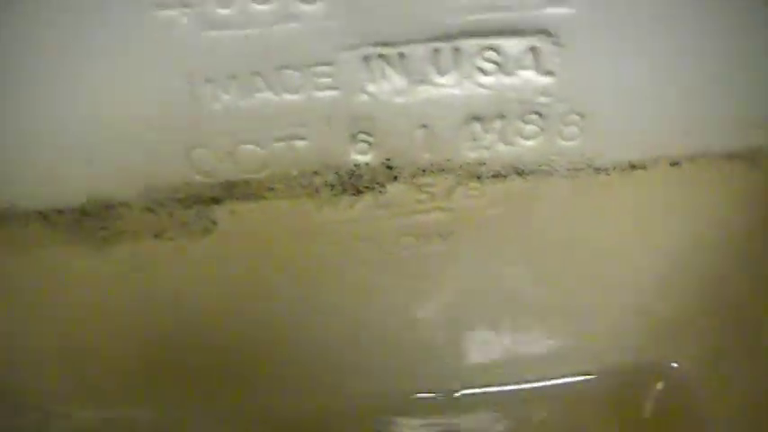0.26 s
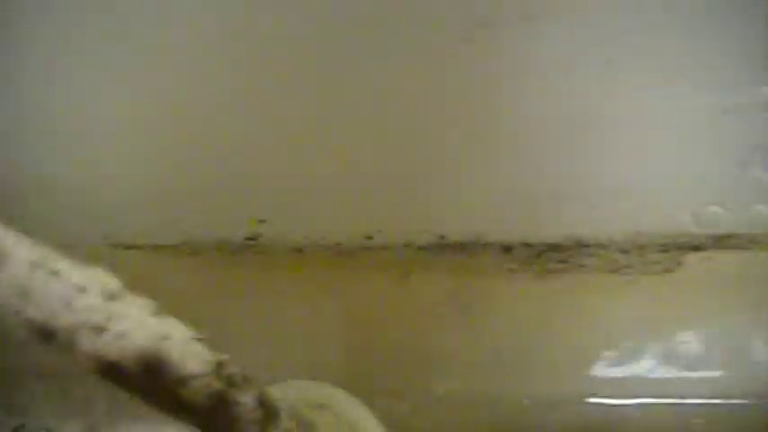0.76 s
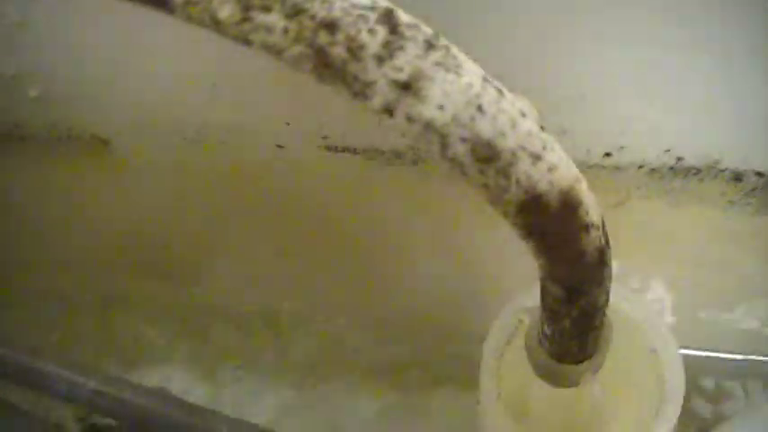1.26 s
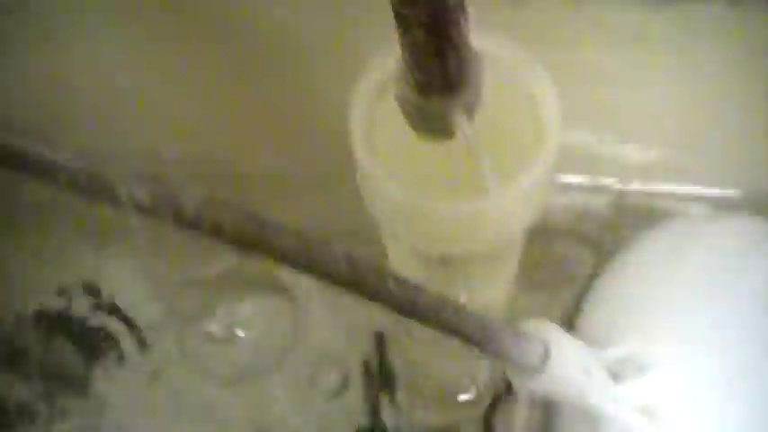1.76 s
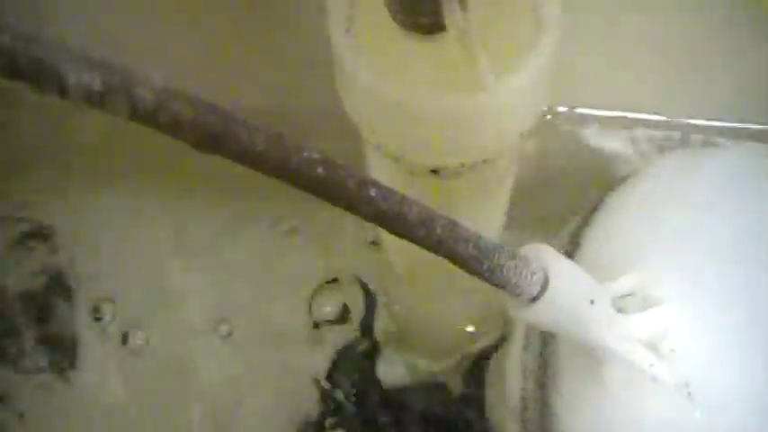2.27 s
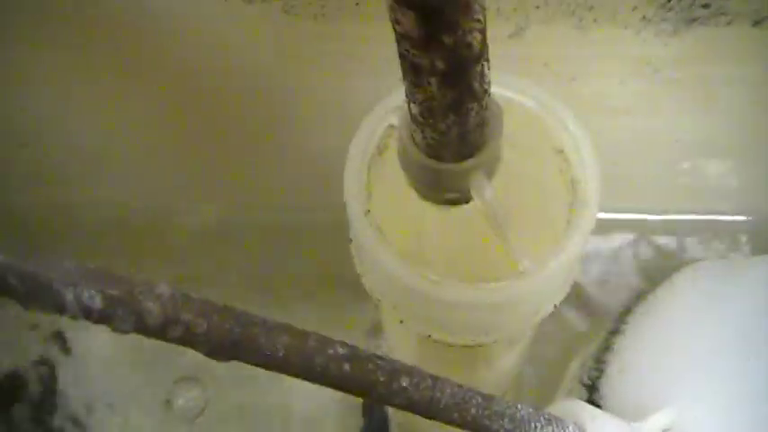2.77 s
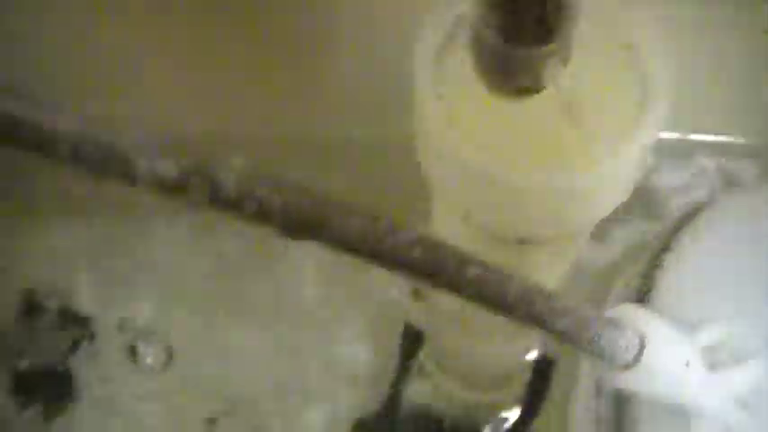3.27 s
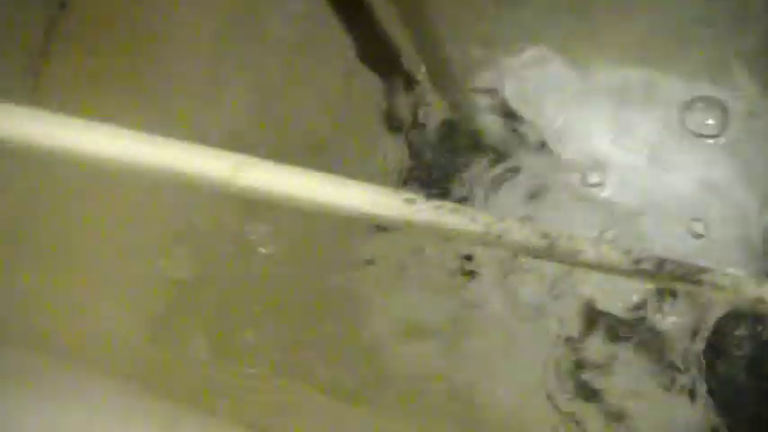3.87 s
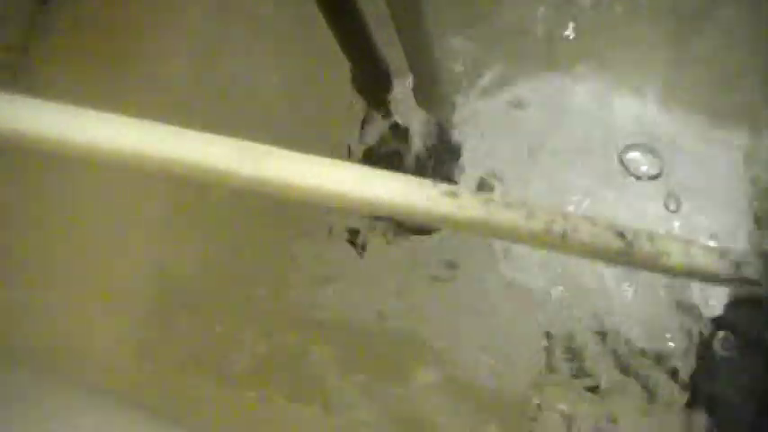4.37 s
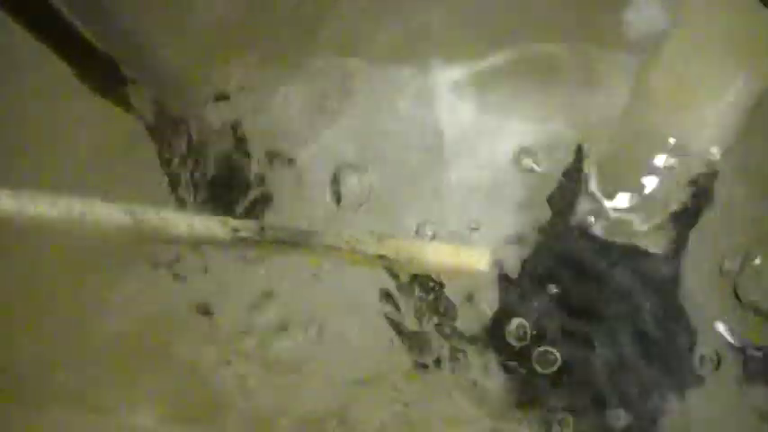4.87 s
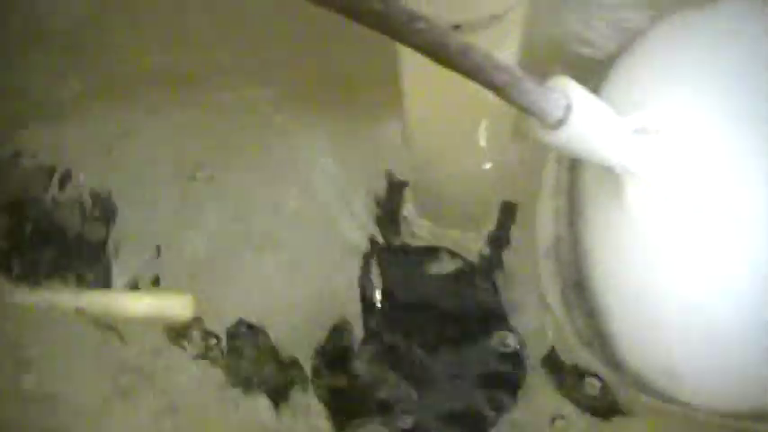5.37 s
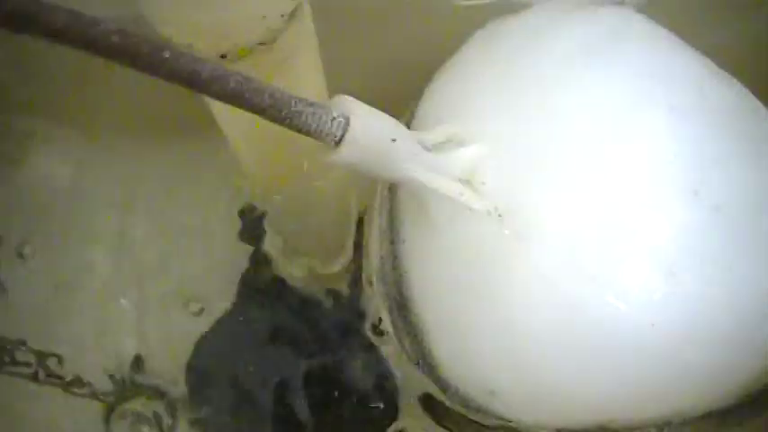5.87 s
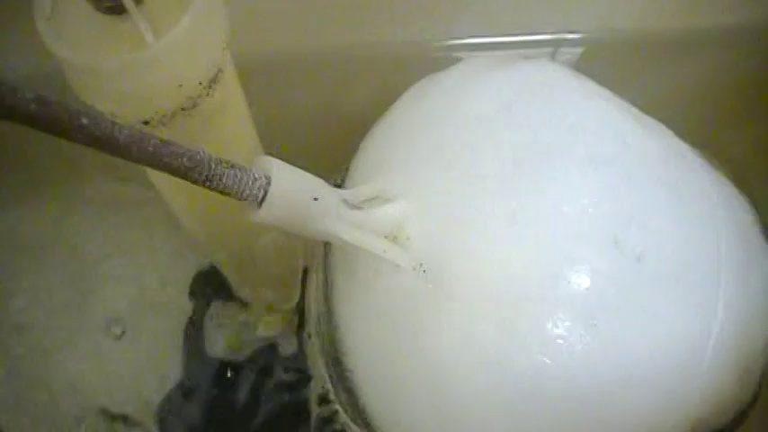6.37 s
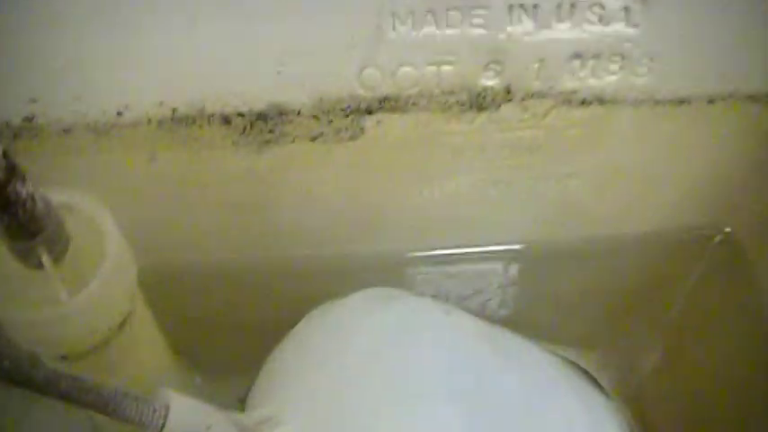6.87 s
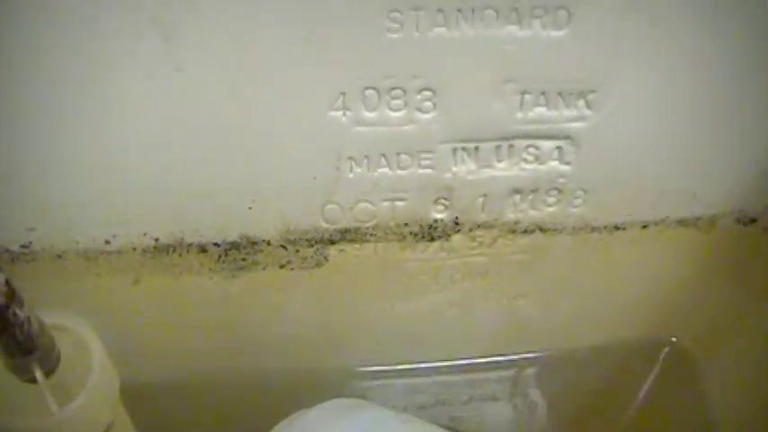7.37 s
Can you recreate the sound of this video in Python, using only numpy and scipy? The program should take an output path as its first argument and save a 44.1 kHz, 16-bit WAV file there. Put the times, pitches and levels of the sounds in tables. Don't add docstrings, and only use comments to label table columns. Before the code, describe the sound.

Constant rushing water fills a hard-walled cistern, ringing in the low and middle range and hissing above. The tone changes as the close, cheap microphone moves from the refill tube to the overflow pipe, the inlet and the float. Irregular crisp spits and duller splashes pepper the flow, with rising bubble pops, soft gulps, a hard snap late on and brief level ducking. The echo is short and enclosed.

```python
import sys
import numpy as np
from scipy import signal
from scipy.fft import rfft, irfft
from scipy.io import wavfile

SR = 44100
rng = np.random.default_rng(int(sys.argv[2]) if len(sys.argv) > 2 else 0)


def store_pcm(level_fs):
    pcm = np.round(np.clip(level_fs, -1, 1) * 32767).astype(np.int16)
    wavfile.write(sys.argv[1], SR, np.atleast_2d(pcm).T)


def boost_factor(decibels):
    exponent = np.asarray(decibels, float) / 20
    return 10 ** exponent


N = 336042

# (time [s], place)
MIC_PLACE = [(0, .8), (.45, 0), (1.2, .1), (1.7, 1), (2.6, 1), (3.3, .9), (3.75, 2), (4.6, 2), (5.1, 2.5),
             (5.65, 3), (6.8, 3), (7.1, 2.7), (7.62, 2.7)]
# (time [s], dip [dB], lean [dB])
MIC_DIP = [(0, 4, -3.5), (.35, 1.7, -3.5), (.75, -1.4, 2), (1.2, 0.8, -1.5), (1.5, 1.2, -3.5),
           (1.9, -1.5, -4.5), (2.25, -1, -0.5), (2.6, -2, 0.5), (3.0, -0.4, 0), (3.45, -0.6, 2.5),
           (4.0, -2, 3), (4.6, -0.25, 2), (5.0, 0, 0), (5.45, 0.7, 1.2), (5.7, -0.6, 2.5), (6.0, 1.5, 0.5),
           (6.9, 0, -1.5), (7.62, -5.5, 0.5)]
# (time [s], level [dB])
PIPE_LEVEL = [(0, -42), (.55, -41.5), (.8, -34.5), (1.6, -36), (2.8, -30.5), (3.67, -33), (3.71, -45),
              (4.5, -43.5), (5.1, -35.5), (7.62, -34)]
# (time [s], level [dB])
SPRAY_LEVEL = [(0, -18), (.36, -21.5), (.53, -24), (.72, -20), (.95, -20.5), (1.29, -21), (1.66, -21),
               (1.85, -25), (2.16, -22), (2.7, -20.5), (3.6, -21), (4.14, -24.5), (4.95, -18), (5.2, -21.5),
               (6.32, -24), (6.94, -22.5), (7.28, -21), (7.62, -23.5)]
# (time [s], treble tilt [dB per octave])
SPRAY_SHADE = [(0, -15), (.5, 0.5), (1.2, -5), (1.7, -5.5), (3.3, -4.5), (3.75, -6), (4.5, -7), (4.9, -12),
               (5.35, -10), (5.7, -8), (6.7, 0), (7.1, -5), (7.62, 1)]
# (time [s], extra path [cm], hollow depth [dB])
WALL_ECHO = [(0, 2.2, 3), (.35, 2.45, 4), (1, 2.6, 6), (1.65, 2.6, 6), (1.88, 1.8, 5), (2.25, 1.7, 2),
             (2.4, 2.6, 5.5), (3.25, 2.6, 5.5), (3.48, 1.75, 5), (3.9, 1.35, 2), (4.7, 1.65, 4),
             (5.45, 1.65, 4), (5.6, 2.15, 6), (6.6, 2.25, 7), (6.8, 2.75, 4), (7.62, 2.7, 2)]

# (frequency [Hz], width [Hz], level at place 0, 1, 2, 3 [dB])
LOW_AIR_MODES = [(256.4, 23, 0.5, 1, -10, -5.5), (345, 18.6, 9, 8.6, -4, 1), (410, 45, -7, 1.4, -4.5, -3)]
MIDDLE_AIR_MODES = [(1110.7, 14, 4, 6.5, -9, -20), (1152.3, 24, 3, -3.5, -4.5, 5),
                    (1198.7, 21.7, -9, 4.5, 6.5, 0.5), (1244.6, 29, 1, -3, 11, 1.5),
                    (1297, 35, -1.5, -6.5, -18, -40)]
UPPER_AIR_MODES = [(1767, 116, -7.5, -5.5, -2.5, -2.5), (1960, 49, 1, -2.5, 5.5, 1.5),
                   (2030, 24, -8, -8, -15, 0), (2098, 74, -0.5, 0, 1.5, -11), (2302.5, 22, 0.5, -3, 2, 2),
                   (2382, 39, 1.5, 1.5, -4.5, 0), (2480, 61, -1.5, 0, 1, -11), (2527, 19, 2.5, -8, -6, -19),
                   (2621, 52, -4.5, -1.5, -4.5, 1.5), (2783, 72, 1, -6.5, -17, -33)]
# (frequency [Hz], width [Hz], level at place 0, 1, 2, 3 [dB])
OVERFLOW_PIPE_MODES = [(880, 59, -2.5, 3.5, -15, 16.5), (905, 30, -12, 4, -8, 25),
                       (943, 146, 3.5, 1.5, -3, 6.4)]
# (frequency [Hz], width [Hz], level at place 0, 1, 2, 3 [dB])
FAINT_AIR_MODES = [(61.6, 25, -85, -80, -62, -62), (98, 13, -71, -66, -65, -65.5),
                   (141, 23, -65, -67, -60, -78), (195, 18, -62, -59.5, -56, -63.5),
                   (522, 40, -66, -61, -53.5, -61), (655, 35, -79, -66, -49, -48.5),
                   (782, 26, -54, -63, -55, -80), (1407, 8.1, -47.5, -42, -52, -40),
                   (1640, 104, -49, -37.5, -34.5, -33.5), (2970, 18, -70, -40.5, -38.5, -45),
                   (3226, 290, -68, -46, -35.5, -38), (3540, 830, -42, -38.5, -35.5, -33.5),
                   (3810, 160, -60, -53, -50, -39.5), (4470, 360, -60, -64, -43, -39)]
# (time [s], length [s], frequency [Hz], level [dB])
MODE_SURGES = [(0.072, .14, 1230, 4), (.1, 0.12, 2310, 2), (0.08, 0.088, 2640, 8), (.36, 0.3, 2470, 12.5),
               (0.582, 0.066, 2480, 10), (0.74, .13, 1200, 19), (0.923, 0.072, 1930, 11),
               (1.16, 0.16, 2520, 6.5), (1.844, 0.044, 1113, 13.5), (1.938, 0.079, 1125, 17.5),
               (1.954, 0.28, 2470, 12.5), (2.12, 0.18, 1180, 7), (0.39, .2, 2800, 3),
               (6.84, 0.086, 2290, 2.5), (6.44, .1, 2305, 3.5), (2.084, 0.12, 1113, 8),
               (2.196, 0.15, 1244, 9.5), (2.25, 0.25, 2600, 12), (2.24, 0.11, 2320, 7),
               (2.32, 0.24, 1113, 7.5), (2.1, 0.3, 2970, 6), (4.02, 0.04, 1200, 11),
               (4.766, 0.075, 1215, 9.5), (4.383, 0.043, 1250, 5.5), (4.064, 0.2, 2300, 3),
               (4.412, 0.24, 1960, 6), (4.62, 0.66, 3230, 7.5), (3.62, 0.33, 3270, 13),
               (5.36, 0.08, 2000, 8.5), (5.718, 0.17, 1960, 2.5), (0.39, .2, 2800, 3),
               (6.11, 0.26, 1113, 3), (6.594, 0.26, 1244, 1), (6.44, .1, 2305, 3.5),
               (6.756, 0.25, 2300, 6.5), (6.72, 0.2, 2000, 6.5), (7.195, 0.36, 1960, 10),
               (7.47, 0.11, 2310, 10), (7.574, 0.13, 1950, 11), (0.18, 0.14, 259, 10), (0.26, 0.7, 522, 12),
               (.95, 0.27, 200, 7), (1.86, 0.3, 259, -10), (1.94, 0.43, 410, -12), (2.2, .4, 522, 1),
               (2.5, 0.24, 259, 6), (2.5, .2, 200, 3), (3.15, 0.23, 259, -15), (3.4, 0.51, 410, 5.5),
               (4.6, 0.22, 345, -7), (5.78, 0.14, 259, -10), (5.5, 1.7, 905, 1.5), (7.45, .3, 259, -8),
               (7.48, 0.18, 410, -4)]
# (frequency [Hz], density [dB per Hz])
BED_SPECTRUM = [(25, -72), (120, -36), (300, 1.5), (620, -46), (800, -13), (1200, 11.5), (1500, 2),
                (2300, 14.5), (3300, 5), (4500, -8.5), (7000, -18), (12000, -13)]
# (frequency [Hz], density [dB per Hz])
SPRAY_SPECTRUM = [(2060, -3.5), (3500, -5), (3870, -2), (4170, -8.5), (4590, -7.5), (5900, -7.5),
                  (6810, -4), (7970, -6.5), (11100, 1), (12500, -1.5), (15700, -10.5)]

# (time [s], peak [dB], frequency [Hz])
SPRAY_SPITS = [(0.1466, 2, 10700), (0.2703, -5, 10100), (0.4614, -4, 10800), (0.4863, 1, 11070),
               (0.7751, 1, 12100), (0.9378, 1, 10100), (1.1578, 1, 10200), (1.2311, 3.5, 10400),
               (1.4835, 0, 12100), (1.694, 1.5, 9770), (1.8008, 2, 11200), (2.0453, -1, 7640),
               (2.4418, 0, 11690), (2.7082, 5, 11800), (2.7387, 5, 11500), (2.7736, 5, 11200),
               (2.8898, -1, 9200), (3.2001, -17, 10900), (3.242, 6, 11800), (3.3007, -7, 9850),
               (3.6464, -1, 10500), (3.693, -3, 9500), (3.7168, 1, 12000), (3.7592, -2, 12400),
               (3.829, -2, 12500), (3.8679, -3, 8790), (3.928, -10, 6600), (4.0535, -2, 12860),
               (4.1448, -2, 9200), (4.2565, -1, 11400), (4.3174, 1, 11100), (4.5778, -3, 10000),
               (4.7629, 0, 9630), (4.4757, -1, 9850), (5.0888, -1, 7500), (5.3742, 0, 10430),
               (6.1913, 1, 10300), (6.2711, 2, 11200), (6.3819, -1, 10500), (6.5026, -3, 11500),
               (6.8279, 0, 10950), (7.2584, 3, 9530), (7.3233, 2.5, 11400),
               (0.0684, -4, 4940), (0.146, -2.5, 5810), (0.355, -3, 3690), (1.4, -6, 3460),
                 (1.5763, -5.5, 4570), (1.6947, 0, 4550), (1.8127, -6, 5150), (2.323, -1.5, 10700),
                 (2.3796, -1, 12700), (2.455, -5, 3490), (2.5075, -7, 4200), (2.534, -3, 5710),
                 (2.575, 1, 10450), (2.588, -5, 4700), (2.61, -5, 12300), (3.104, -7, 3800),
                 (3.228, 5, 3400), (3.477, -2, 3050), (3.896, -1, 3800), (4.3, -2, 12200),
                 (4.7351, -22, 3210), (5.1267, -4.5, 4740), (5.4068, -10, 11000), (5.41, -14, 6000),
                 (5.934, -3, 4700), (7.0896, -2.5, 4470), (7.233, -5, 4460), (7.567, -3, 4630),
                 (7.5988, -2, 4520),
               (.0189, -12, 7840), (.0418, 1, 11800), (0.408, -3, 11400), (.4269, -6, 10200),
              (0.7198, -13, 10600), (1.1069, -3, 10100), (1.5938, -1, 6100), (1.721, -2, 8950),
              (1.8721, -9, 6600), (1.957, 0, 9700), (1.983, -6, 6860), (1.994, -3, 6900), (2.135, -6, 8050),
              (2.4275, -6, 9920), (2.6803, -4.5, 4730), (2.867, -2.5, 5650), (3.4012, -14, 7220),
              (3.429, -4.5, 7260), (3.4496, -4, 7040), (3.5324, -12, 6650), (3.5513, -4, 6570),
              (3.673, -8, 5620), (4.0602, -6, 9320), (4.2626, -4.5, 4730), (4.5296, -2, 9940),
              (4.6997, -5, 4900), (4.8184, -20, 6700), (4.8728, -6, 7060), (4.8986, -8, 6660),
              (5.236, -5, 6460), (5.4037, -12, 6600), (5.495, -3, 6750), (5.501, -9, 6700),
              (5.552, -9, 6200), (5.5815, 0, 10600), (5.6506, -7, 4900), (5.7633, -19, 6670),
              (6.266, -5, 6600), (5.7887, -9, 6700), (6.1305, -7, 13200), (6.1887, -3, 6600),
              (6.3066, -18, 4700), (6.341, -2, 10200), (6.4228, -4.5, 4900), (6.5035, -6, 5160),
              (6.6767, -7, 10400), (6.6846, -0.5, 7800), (6.686, -3.5, 3970), (6.9686, -3, 10300),
              (6.9711, -22, 6970), (6.985, -3, 10300), (7.0646, -5, 7640), (7.145, -1, 10900),
              (7.233, 1, 11200), (7.376, -7, 4520), (7.4649, -10.5, 6760), (7.479, -2, 8500)]
# (time [s], peak [dB], start pitch [Hz], rise [Hz per s], t60 [s])
BUBBLE_POPS = [(.005, -42, 345, -26, 0.058), (.005, -39.5, 535, -20, 0.61), (.005, -32, 880, -12, 0.099),
               (.115, -23, 880, 500, 0.063), (1.378, -16, 745, 1100, 0.17), (1.378, -15, 880, 0, 0.072),
               (1.53, -16, 839, 1203, 0.18), (2.365, -41, 673, 1504, 0.14),
               (2.585, -19.5, 723, 2504, 0.016), (2.813, -29, 410, 500, 0.098), (4.49, -25, 381, 398, 0.13),
               (4.69, -31, 746, 990, 0.14), (4.995, -25, 790, 1501, 0.11), (5.054, -14, 827, 2000, 0.067),
               (5.341, -26, 423, 2, 0.15), (5.83, -29, 790, 1502, .08)]
# (time [s], peak [dB], start pitch [Hz], rise [Hz per s], t60 [s])
SLOW_GURGLES = [(.21, -22, 269, 1500, 0.12), (.37, -30, 349, 0, 0.17), (.525, -29, 352, 302, .1),
                (1.454, -0.5, 843, 1502, .07), (1.62, -35, 470, -800, 0.3), (2.2, -27, 406, 1800, 0.12),
                (2.228, -15, 420, -800, 0.16), (2.415, -20.5, 332, 0, 0.16), (3.065, -23, 410, -1500, 0.12),
                (3.19, -26, 331, -12, .12), (3.27, -26, 407, -600, 0.16), (3.4, -19, 346, 3, 0.2),
                (3.64, -25.5, 421, -300, 0.18), (4.2, -25, 353, 4, 0.097), (4.76, -24, 362, 0, 0.16),
                (5.96, -36, 345, -2, .12), (6.675, -26, 345, 0, 0.15), (7.035, -39, 345, -2, .12)]
# (time [s], peak [dB], length [s])
MIC_CRACKS = [
    (5.4076, -16, .0005),
    (5.4109, -1.5, .0004),
    (2.8908, -5, .0004),
    (1.695, -8, .0004),
]
# (time [s], peak [dB], start pitch [Hz], rise [Hz per s], t60 [s])
ARM_KNOCKS = [
    (3.472, -25, 348, 0, 0.089),
    (3.474, -28, 490, 500, .057),
    (3.473, -35, 240, 0, 0.066),
    (4.953, -21, 345, 0, 0.23),
    (4.954, -21, 650, 0, 0.055),
    (4.954, -29, 208, -2, 0.096),
    (4.954, -33.5, 115, -2, .08),
]
# (time [s], drop [dB])
GAIN_DUCKS = [(.147, 3.5), (0.483, 4.5), (.72, 5), (1.157, 5.5), (1.232, 6.5), (1.693, 3.5), (2.705, 6.5),
              (2.89, 5.5), (3.225, 6), (5.41, 9), (6.192, 4.5), (6.504, 4), (6.85, 4), (7.258, 6)]

LOW_DB, LOW_FOLLOWS = (-44, -42.5, -42.5, -41.5), 0.21
MIDDLE_DB, MIDDLE_FOLLOWS = (-29.5, -22.5, -17.5, -24), 1.48
UPPER_DB, UPPER_FOLLOWS = (-26, -20.5, -22.5, -20), 0.99


def rms_one(x):
    return x / np.sqrt(np.mean(x ** 2) + 1e-20)


def in_time(rows):
    s, *columns = np.transpose(rows)
    return [np.interp(np.arange(N) / SR, s, c) for c in columns]


def drift(rate):
    r = np.exp(-40 * np.pi * rate / SR)
    slow = signal.lfilter([1], [1, -2 * r, r * r], rng.standard_normal(N // 20 + 2002))[2000:]
    return np.interp(np.arange(N) / 20, np.arange(len(slow)), rms_one(slow))


def coloured(x, spectrum):
    hz, level_db = np.transpose(spectrum)
    grid = np.arange(len(x) // 2 + 1) * SR / len(x) + 1
    gain = boost_factor(np.interp(np.log(grid), np.log(hz), level_db))
    return rms_one(irfft(rfft(x) * gain, len(x)))


def resonance(x, hz, width_hz):
    r = np.exp(-np.pi * width_hz / SR)
    return rms_one(signal.lfilter([1, 0, -1], [1, -2 * r * np.cos(2 * np.pi * hz / SR), r * r], x))


def surge_db(hz):
    reach = 0.032
    t = np.arange(0, N + 200, 200) / SR
    total_db = 0
    for s, length, at_hz, db in MODE_SURGES:
        nearness = (np.log(at_hz / hz) / reach) ** 2
        total_db = total_db + db * np.exp(-(2 * (t - s) / length) ** 2 - nearness)
    return np.interp(np.arange(N) / SR, t, total_db)


def air_modes(modes, place, steep_hz, even=True):
    out, power = 0, 0
    for hz, width_hz, *db in modes:
        gain = boost_factor(np.interp(place, range(4), db) + 1.76 * drift(3.5))
        tone = resonance(rng.standard_normal(N), hz, width_hz)
        tone = resonance(resonance(tone, hz, steep_hz), hz, 2 * steep_hz)
        out = out + gain * boost_factor(surge_db(hz)) * tone
        power = power + gain ** 2
    return out / np.sqrt(power) if even else out


def gulps():
    below_hz, gulp_db, fall_s = 470, -17.5, 0.073
    t = np.arange(N) / SR
    extra = np.zeros(N)
    for s, db, hz, *_ in BUBBLE_POPS + ARM_KNOCKS:
        if hz < below_hz:
            extra += boost_factor(db + gulp_db) * (t > s) * np.exp(-np.abs(t - s) / fall_s)
    return extra


def jet_roar(place, dip_db, upper_db):
    low_db = np.interp(place, range(4), LOW_DB) + LOW_FOLLOWS * dip_db + 2.1 * drift(37)
    middle_db = np.interp(place, range(4), MIDDLE_DB) + MIDDLE_FOLLOWS * dip_db + drift(13.6)
    roar = (boost_factor(low_db) + gulps()) * air_modes(LOW_AIR_MODES, place, steep_hz=163)
    roar += boost_factor(middle_db) * air_modes(MIDDLE_AIR_MODES, place, steep_hz=182)
    roar += boost_factor(upper_db) * air_modes(UPPER_AIR_MODES, place, steep_hz=292)
    return roar + air_modes(FAINT_AIR_MODES, place, steep_hz=251, even=False)


def overflow_pipe(place):
    pipe_db, = in_time(PIPE_LEVEL)
    return boost_factor(pipe_db) * air_modes(OVERFLOW_PIPE_MODES, place, steep_hz=137)


def tank(x, wet_db, count=24):
    t60_s, first_t60_s = 0.069, 0.012
    hop, tail = -(-N // (count - 1)), np.arange(SR // 10) / SR
    decay = boost_factor(-60 * tail / t60_s) + 1.05 * boost_factor(-60 * tail / first_t60_s)
    fade = np.sin(np.pi * np.arange(2 * hop) / (2 * hop))
    padded, out = np.pad(x, (hop, 2 * hop)), np.zeros(N + 4 * hop)
    for k in range(count):
        echo = rng.standard_normal(len(tail)) * decay
        echo /= np.sqrt(np.sum(echo ** 2))
        part = signal.oaconvolve(padded[k * hop:][:2 * hop] * fade, echo)
        out[k * hop:][:len(part)] += part
    return x + boost_factor(wet_db) * out[hop:hop + N]


def roar_bed(upper_db):
    rush = rng.standard_normal(N) * boost_factor(1.7 * drift(22))
    bed = coloured(tank(rush, wet_db=5.0), BED_SPECTRUM)
    return bed * boost_factor(-26 + .5 * (upper_db - upper_db.mean()))


def swell(rise_s, fall_s):
    t = np.arange(-SR // 100, SR // 100) / SR
    return np.exp(np.where(t < 0, t / max(rise_s, 1e-5), -t / max(fall_s, 1e-5)))


def splats(per_s, spread_db):
    size = boost_factor(spread_db * np.minimum(rng.exponential(1, N), 3.1))
    return size * (rng.random(N) < per_s / SR)


def ping(hz, cycles):
    t = np.arange(SR // 60) / SR
    return np.sin(2 * np.pi * hz * t) * boost_factor(-60 * t * hz / cycles)


def droplets(clumps):
    born = splats(400 * clumps, 2.5) * rng.choice([-1, 1], N)
    dealt = rng.integers(0, 12, N)
    drops = 0
    for k, hz in enumerate(np.geomspace(4300, 15000, 12)):
        drops = drops + signal.oaconvolve(born * (dealt == k), ping(hz, 18.0))[:N] * np.sqrt(hz)
    return signal.lfilter([1, -.75], [1], drops)


def spray():
    spray_db, = in_time(SPRAY_LEVEL)
    clumps = boost_factor(2.0 * drift(30) + 0.6 * drift(8.5))
    shared, edges, fizz = splats(120 * clumps, 6.2), np.geomspace(2800, 18000, 8), 0
    for low, high in zip(edges, edges[1:]):
        share = 0.92 * rng.random(N) ** 2.0
        hits = shared * share + 1.27 * splats(120 * clumps, 4.9)
        size = signal.oaconvolve(hits, swell(0.0012, 0.00054), "same")
        sos = signal.butter(2, [low, high], "band", fs=SR, output="sos")
        band = signal.sosfilt(sos, rng.standard_normal(N))
        fizz = fizz + band * (size + clumps ** .5)
    fizz = rms_one(fizz) + boost_factor(-5.0) * rms_one(droplets(clumps))
    return boost_factor(spray_db) * coloured(tank(fizz, wet_db=-5.5), SPRAY_SPECTRUM)


def air_pocket(rows, attack_s):
    out, t = np.zeros(N + SR), np.arange(SR // 4) / SR
    onset = np.sin(np.pi / 2 * np.minimum(t / attack_s, 1)) ** 2
    for s, db, hz, rise, t60 in rows:
        tone = np.sin(2 * np.pi * (hz * t + rise * t ** 2 / 2))
        out[round(s * SR):][:len(t)] += boost_factor(db - 60 * t / t60) * tone * onset
    return out[:N] * boost_factor(2.5 * drift(23))


def bubbles():
    return air_pocket(BUBBLE_POPS, attack_s=.004)


def spits():
    ring_width, ring_cycles = .13, 15
    hits, size = SPRAY_SPITS, SR // 50
    out = np.zeros(N + SR)
    grit = coloured(rng.standard_normal(len(hits) * size), SPRAY_SPECTRUM).reshape(-1, size)
    for (s, db, hz), noise, white in zip(hits, grit, rng.standard_normal(grit.shape)):
        ring = resonance(noise + 0.24 * white, hz, ring_width * hz) * swell(0.00055, ring_cycles / hz)
        burst = 0.58 * ring / np.abs(ring).max() + 0.3 * noise * swell(0.00039, 0.00043)
        out[round((s + .001) * SR):][:size] += boost_factor(db - 3.0) * burst
    sos = signal.butter(4, 2400, "high", fs=SR, output="sos")
    out = signal.sosfilt(sos, out[size // 2:][:N] + 1e-18)
    return tank(out, wet_db=-8)


def near_reflections(x):
    sound_cm_per_s, width, tilt_hz = 34300, 0.056, 8400
    hz, s, frames = signal.stft(x, SR, nperseg=512)
    hz = hz[:, None]
    at, path_cm, depth_db = np.transpose(WALL_ECHO)
    hollow_hz = sound_cm_per_s / 2 / np.interp(s, at, path_cm)
    depth_db = np.interp(s, at, depth_db)

    def bell(ratio):
        return np.exp(-.5 * (np.log((hz + 1) / (ratio * hollow_hz)) / width) ** 2)

    shape = 0.18 * (bell(0.645) + bell(1.33)) - bell(0.98)
    tilt_db = np.interp(s, *np.transpose(SPRAY_SHADE)) * np.log2(np.maximum(hz / tilt_hz, 1))
    return signal.istft(frames * boost_factor(depth_db * shape + tilt_db), SR, nperseg=512)[1][:N]


def gurgles():
    return air_pocket(SLOW_GURGLES, attack_s=.026)


def cracks():
    out, t = np.zeros(N + SR), np.arange(-SR // 200, SR // 200) / SR
    for s, db, length in MIC_CRACKS:
        chirp = np.sin(2 * np.pi * (14000 * t - 2e6 * t ** 2))
        snap = chirp + .2 * rng.standard_normal(len(t))
        out[round(s * SR):][:len(t)] += boost_factor(db) * snap * np.exp(-(t / length) ** 2)
    return out[len(t) // 2:][:N]


def knocks():
    return air_pocket(ARM_KNOCKS, attack_s=.002)


def scene():
    place, = in_time(MIC_PLACE)
    dip_db, lean_db = in_time(MIC_DIP)
    upper_db = np.interp(place, range(4), UPPER_DB) + UPPER_FOLLOWS * dip_db + lean_db
    water = jet_roar(place, dip_db, upper_db) + overflow_pipe(place) + roar_bed(upper_db)
    treble = near_reflections(spray() + spits())
    return (water + treble + bubbles() + gurgles() + cracks() + knocks())[None]


def top_cut(x):
    return signal.sosfilt(signal.butter(12, 15830, fs=SR, output="sos"), x)


def record(dry):
    recovery_db_per_s, low_cut_hz, top_hz = 30.5, 63, 15780
    t = np.arange(N) / SR
    drop_db = np.max([(db - recovery_db_per_s * (t - s)) * (t > s + .002) for s, db in GAIN_DUCKS], axis=0)
    x = dry * signal.lfilter([.02], [1, -.98], boost_factor(0.29 - np.maximum(drop_db, 0)))
    x = x / (1 + (x / .76) ** 6) ** (1 / 6)
    x = signal.sosfilt(signal.butter(2, low_cut_hz, "high", fs=SR, output="sos"), x)
    x = signal.sosfilt(signal.ellip(12, .2, 85, top_hz, fs=SR, output="sos"), x)
    return top_cut(x)


dry = scene()
out = record(dry)
store_pcm(out)
```